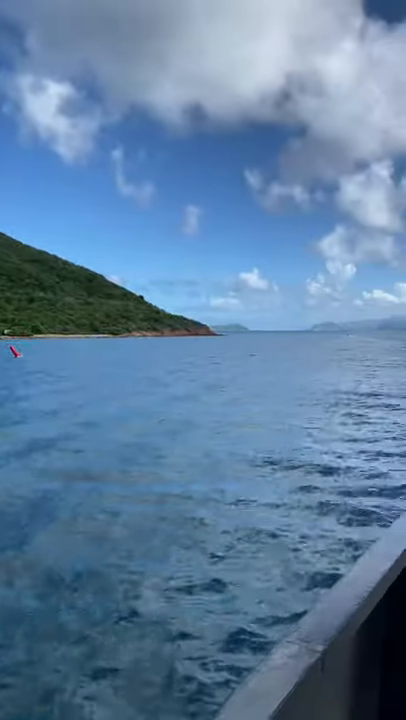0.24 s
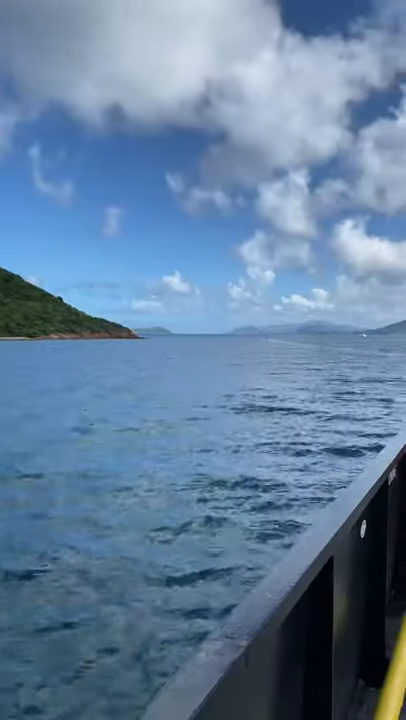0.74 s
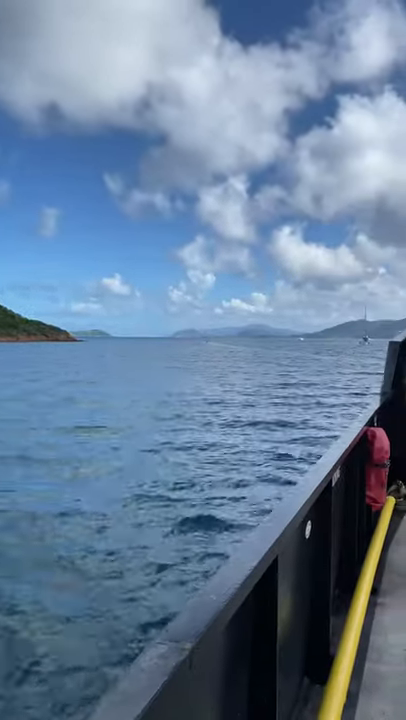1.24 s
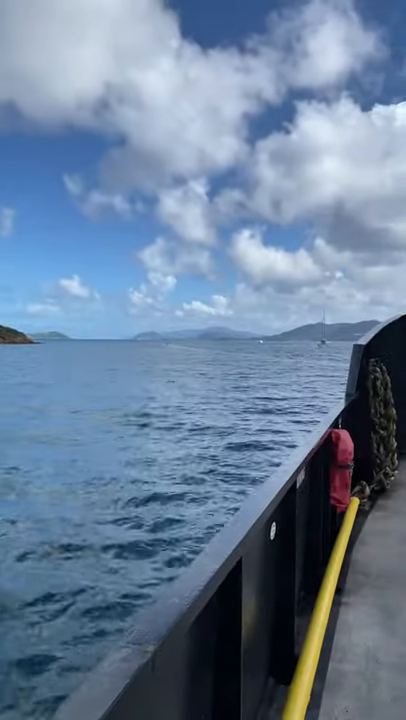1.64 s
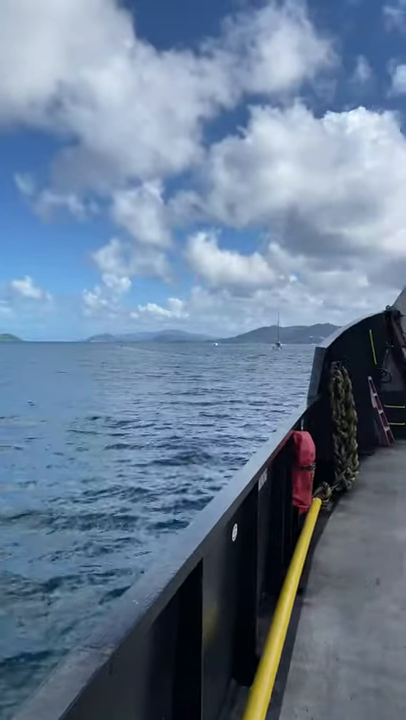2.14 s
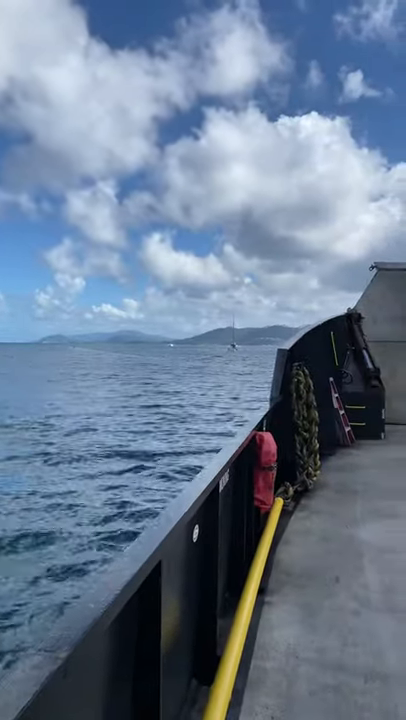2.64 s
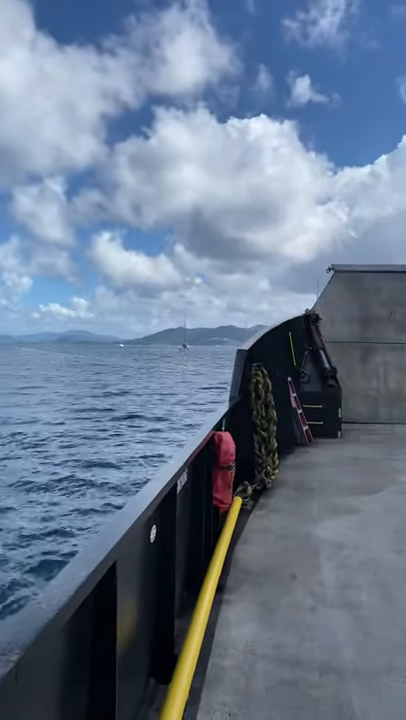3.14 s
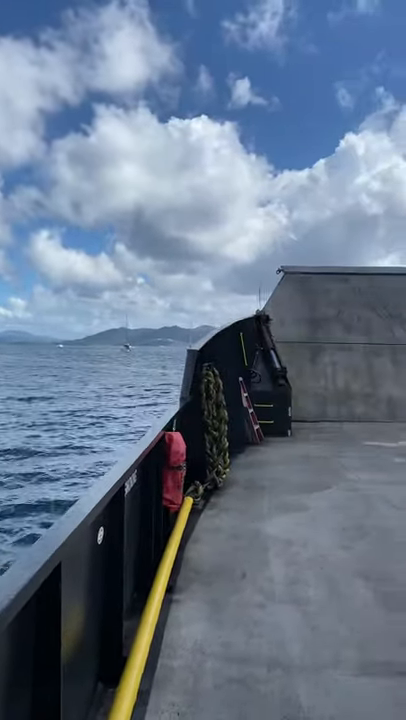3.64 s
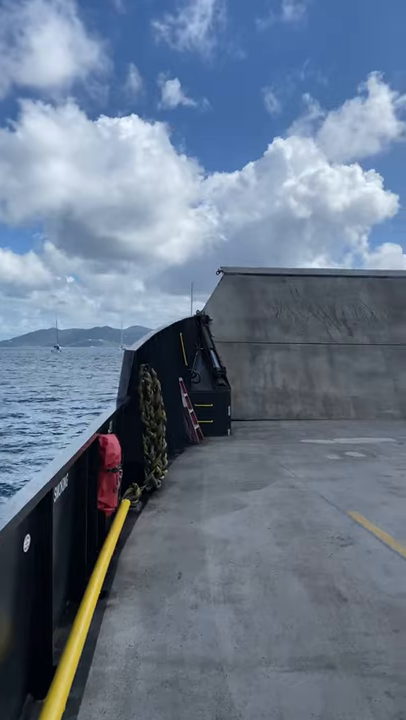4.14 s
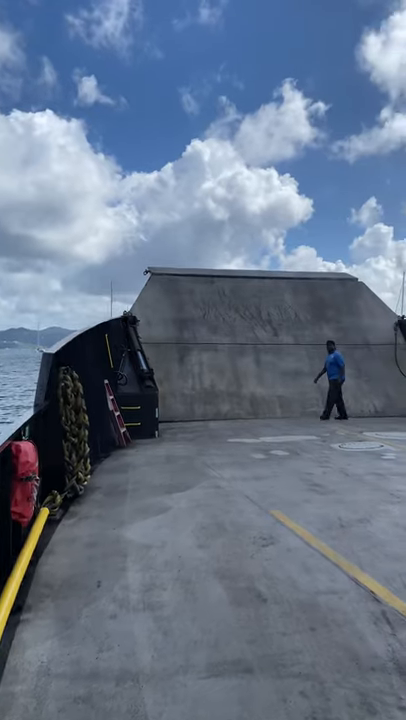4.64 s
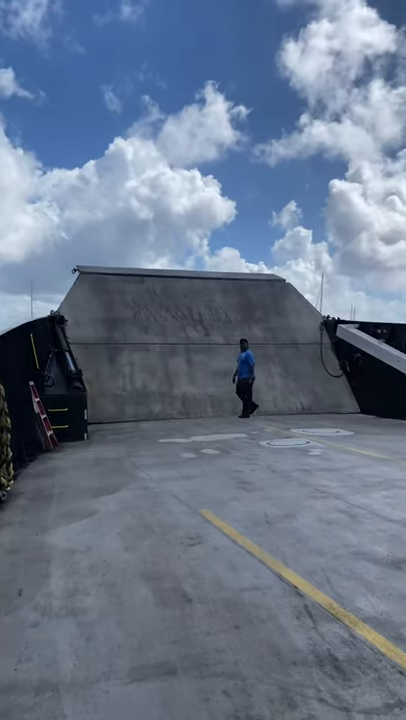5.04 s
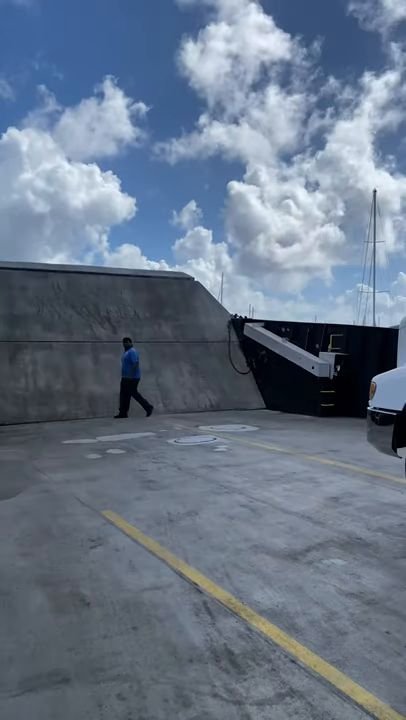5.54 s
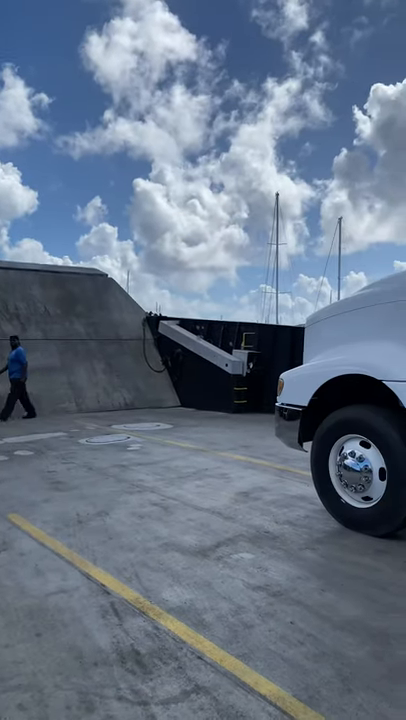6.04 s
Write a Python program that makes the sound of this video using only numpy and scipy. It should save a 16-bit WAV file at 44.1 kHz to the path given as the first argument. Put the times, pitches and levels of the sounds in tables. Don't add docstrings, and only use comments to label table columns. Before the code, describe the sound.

Wind buffets a handheld stereo microphone on a moving ferry. Low engine rumble and exhaust roar stay constant and grow slightly. Within the first two seconds, gear thumps the steel deck: a muffled knock, one loud crashing clank with a ringing tail that briefly makes the bass dip, then smaller rattling knocks. Afterwards the hum continues over soft hull wash, with tiny squeaks and a single dry tap past the middle.

```python
import sys
import numpy as np
from scipy import signal
from scipy.fft import rfft, irfft, next_fast_len
from scipy.io import wavfile
from scipy.ndimage import uniform_filter1d, map_coordinates

SR = 44100
rng = np.random.default_rng(int(sys.argv[2]) if len(sys.argv) > 2 else 0)


def attenuation_scalar(level_db):
    decades = np.asarray(level_db, float) / 20
    return 10 ** decades


def file_out(sig):
    cols = np.atleast_2d(sig).T
    lim = np.clip(cols, -1, 1)
    pcm = np.round(lim * 32767).astype(np.int16)
    wavfile.write(sys.argv[1], SR, pcm)


N = 277207


def unit(x):
    return x / np.sqrt(np.mean(x ** 2) + 1e-20)


def since(s):
    return np.maximum(np.arange(N) / SR - s, 0)


def along(points, hz):
    f, *cols = np.transpose(points)
    return np.array([np.interp(np.log(hz + 1), np.log(f + 1), c) for c in cols])


def curves(rows):
    s, *cols = np.transpose(rows)
    return [np.interp(np.arange(N) / SR, s, c) for c in cols]


def wobble(rate):
    knots = rng.standard_normal(int(N * rate / SR) + 4)
    return map_coordinates(knots, [np.arange(N) * rate / SR])


def filtered(x, response):
    m = next_fast_len(x.shape[-1] + 8192)
    spectrum = rfft(x, m) * response(np.fft.rfftfreq(m, 1 / SR))
    return irfft(spectrum, m)[..., :x.shape[-1]]


def rush(gain, patchy_db):
    z = signal.stft(rng.standard_normal((2, N)), nperseg=512)[2]
    field = rng.standard_normal(z.shape[1:])
    field = uniform_filter1d(field, size=6, axis=0)
    field = uniform_filter1d(field, size=12, axis=1)
    patchy = signal.istft(z * attenuation_scalar(patchy_db * unit(field)), nperseg=512)[1][:, :N]
    return unit(filtered(patchy, gain))


# (time [s], depth [dB], hold [s])
BASS_DUCKS = [
    (0.0, 12, 0.25),
    (0.875, 12, 0.31),
]


def bass_duck_db():
    fall_s, recover_s = .06, .15
    total_db = 0
    for s, depth_db, hold_s in BASS_DUCKS:
        fall = 1 - np.exp(-since(s) / fall_s)
        total_db = total_db + depth_db * fall * np.exp(-since(s + hold_s) / recover_s)
    return total_db


# (multiple of the firing rate [ratio], level [dB], unsteadiness [dB])
DIESEL_ORDERS = [(1, 0, .5), (2, -2, 1.5), (3, -11, 1.5), (7 / 3, -14, 1.5), (11 / 3, -14, 1)]
# (frequency [Hz], level re firing tone [dB])
TWIN_MACHINES = [(60.05, -4.5), (58.6, -6.5)]
# (frequency [Hz], level re firing tone [dB])
HUM_TONES = [(69.4, -13.5), (92.9, -13), (119.75, -7), (124.7, -15), (140.8, -20), (176.3, -15.5),
             (191, -17), (236, -19), (299, -24.5), (320, -27), (390, -24.5), (406, -21), (475, -26.5),
             (1360, -28), (1760, -36)]


def engine_tones():
    firing_hz = 43.96
    opposed_s = 4.35
    t = np.arange(N) / SR
    turns = firing_hz * t + 0.0015 * np.cumsum(wobble(0.98)) / SR
    tones = np.zeros(N)
    for order, db, loose_db in DIESEL_ORDERS:
        tones += attenuation_scalar(db + loose_db * wobble(2)) * np.sin(2 * np.pi * (order * turns + rng.random()))
    for k, (hz, db) in enumerate(TWIN_MACHINES):
        tones += (-1) ** k * attenuation_scalar(db) * np.sin(2 * np.pi * hz * (t - opposed_s))
    for hz, db in HUM_TONES:
        tones += attenuation_scalar(db + 1.5 * wobble(3)) * np.sin(2 * np.pi * hz * t + 1.43 * wobble(2))
    return np.sqrt(2) * attenuation_scalar(-22) * tones


# (time [s], level re roar [dB])
DRONES = [
    (0.0, -7),
    (.86, 10.5),
    (1.24, -0.5),
    (1.46, -0.3),
]


def deck_drone():
    rise_s, t60_s = .032, 1.3
    strength = 0
    for s, db in DRONES:
        strength = strength + attenuation_scalar(db - 60 * since(s) / t60_s) * (1 - np.exp(-since(s) / rise_s))
    return strength


# (frequency [Hz], level [dB per Hz])
EXHAUST_COLOUR = [(15, -90), (28, -56.5), (38, -42.5), (52, -36), (75, -37), (110, -42), (170, -43),
                  (230, -51.5), (400, -55.5), (600, -59), (810, -61.5), (1050, -61.5), (1500, -67.5),
                  (1950, -76), (2200, -74.5), (2700, -78.5)]


def machinery():
    rumble_db, roar_db = -21.5, -30
    grows_db = 0.52
    rumble_share = .6
    drone_hz = 1100
    t = np.arange(N) / SR
    duck_db = bass_duck_db()

    def colour(hz):
        return attenuation_scalar(along(EXHAUST_COLOUR, hz)[0])

    def low(hz):
        return 1 / (1 + (hz / 280) ** 4)

    rumble = rush(lambda hz: colour(hz) * np.sqrt(low(hz)), patchy_db=0.44)
    roar = rush(lambda hz: colour(hz) * np.sqrt(1 - low(hz)) * (hz < 2700), patchy_db=1.36)
    dull_roar = unit(filtered(roar, lambda hz: 1 / (1 + (hz / drone_hz) ** 2)))
    noise = attenuation_scalar(rumble_db + grows_db * (t - t.mean()) - rumble_share * duck_db) * rumble
    noise += attenuation_scalar(roar_db + 0.6 * wobble(6)) * (roar + deck_drone() * dull_roar)
    noise[0] += attenuation_scalar(-duck_db) * engine_tones()
    return noise


# (frequency [Hz], level [dB per Hz])
STEEL_COLOUR = [(60, -10), (200, 5), (1000, -5), (1850, -10.5), (2250, -6.5), (2700, -13.5), (3100, -9.5),
                (3700, -23.5), (4350, -18), (5500, -30.5), (7000, -38), (8000, -40.5), (10000, -50.5),
                (15500, -49)]


def steel_burst(t, centre_hz, dull_db):
    def colour(f):
        octaves = np.log2((f + 1) / centre_hz)
        slope_db = 4.6 * np.minimum(octaves, 0) - dull_db * np.maximum(octaves, 0)
        return attenuation_scalar(along(STEEL_COLOUR, f)[0] + slope_db)

    return unit(filtered(rng.standard_normal((2, len(t))), colour))


# (frequency [Hz], level [dB], 60 dB decay time [s])
PLATE_MODES = [(121, 3.5, 0.42), (180, 1.5, 0.76), (226.8, 2.5, 0.55), (380, -6, 0.24), (475, -3.5, 0.29),
               (650, -4.5, 0.38), (782, 2.5, 0.17), (942, 2.5, 0.36), (1350, -1, 0.16), (1680, -11, 0.23),
               (2280, -9, 0.19), (2560, -8, 0.25), (3160, -19, .15), (3280, -17, .15)]


def plate_ring(t, db, centre_hz):
    best_hz, heavy_db = 950, -20
    octaves = np.log2(centre_hz / (best_hz + 1))
    ring_db = db - 8 + .8 * (db - heavy_db)
    ring_db -= 10 * max(octaves, 0) + 3 * max(-octaves, 0)
    ring = np.zeros((2, len(t)))
    for hz, level_db, t60 in PLATE_MODES:
        envelope = attenuation_scalar(ring_db + level_db + rng.normal(0, 2.2) - 60 * t / t60)
        ring += envelope * np.sin(2 * np.pi * (hz * t + rng.random((2, 1))))
    return ring


# (time [s], rms level [dB], centre [Hz], dullness [dB per octave], 60 dB decay time [s])
KNOCKS = [(.298, -23, 1670, 22, .3), (.335, -30, 1300, 21, .4), (.790, -18.5, 3030, 11, .2),
          (0.8, -13.5, 2400, 2.5, .13), (.805, -19.5, 2310, .8, .08), (.814, -12, 1013, 11, .13),
          (.822, -20.5, 450, 6.5, 0.48), (.832, -17, 180, 6, .45), (.847, -22.5, 2700, 4.5, .25),
          (.905, -31.5, 1100, 2.5, 0.27), (0.999, -25.5, 2500, 18, 0.07), (1.044, -36, 2700, 7, 0.14),
          (1.209, -32, 3020, 3.5, 0.18), (1.252, -39.5, 2550, 3, 0.18), (1.292, -23.5, 704, 5.5, 0.26),
          (1.457, -23, 3400, 1.5, .2), (1.487, -27.5, 2820, 4.5, 0.33), (1.511, -31, 2790, 1, 0.18),
          (1.531, -30, 2990, -0.7, .2), (1.56, -37.5, 3030, 6, 0.22), (1.802, -37.5, 2980, 32, 0.15),
          (3.743, -27.5, 3200, -2.5, 0.023), (3.752, -39, 2900, 8, .15)]


def knocks():
    rattle_depth_db, rattle_rate, rattle_delay_s = 2.2, 140, .015
    hard_rise_s, soft_rise_s = .0017, .00016
    out, t = np.zeros((2, N + SR)), np.arange(SR // 2) / SR
    rattle_db = np.pad(rattle_depth_db * wobble(rattle_rate), (0, SR))
    for s, db, hz, dull_db, t60 in KNOCKS:
        start = round(s * SR)
        burst = steel_burst(t, hz, dull_db) * attenuation_scalar(db - 60 * t / t60)
        rattle = attenuation_scalar(rattle_db[start:][:len(t)] * (1 - np.exp(-t / rattle_delay_s)))
        rise = 1 - np.exp(-t / (hard_rise_s + soft_rise_s * dull_db))
        out[:, start:][:, :len(t)] += (burst + plate_ring(t, db, hz)) * rattle * rise
    return out[:, :N]


# (time [s], peak level [dB], 60 dB decay time [s])
TINKS = [(.812, -54.5, .2), (1.263, -37.5, .08), (1.457, -54.5, .1), (1.489, -56, .1), (1.531, -54, 0.083),
         (1.802, -39, 0.095), (1.844, -49, 0.1), (3.64, -56.5, .1), (5.021, -62.5, .12)]
# (frequency [Hz], level [dB])
FITTING_MODES = [(15150, -9.5), (15400, -6), (14250, -15), (12300, -19.5), (7440, -13.5)]
# (time [s], length [s], start pitch [Hz], end pitch [Hz], level [dB])
SQUEAKS = [
    (2.90, .09, 8550, 8600, -62),
    (3.02, .11, 7850, 8000, -56),
    (3.20, .06, 8600, 8600, -64),
    (3.61, .08, 8200, 8200, -62),
]


def fittings():
    out, t = np.zeros((2, N + SR)), np.arange(SR // 4) / SR
    for s, db, t60 in TINKS:
        ring = np.zeros((2, len(t)))
        for hz, level_db in FITTING_MODES:
            ring += attenuation_scalar(level_db + rng.normal(0, 3)) * np.sin(2 * np.pi * (hz * t + rng.random((2, 1))))
        ring *= attenuation_scalar(db - 60 * t / t60) * (1 - np.exp(-t / .001))
        bright = np.diff(rng.standard_normal((2, len(t) + 4)), 4) / 8
        tick = attenuation_scalar(db - 5.5 - 60 * t / .02) * bright
        out[:, round(s * SR):][:, :len(t)] += ring + tick
    for s, length, start_hz, end_hz, db in SQUEAKS:
        u = np.clip(t / length, 0, 1)
        glide = np.cumsum(start_hz + (end_hz - start_hz) * u) / SR
        out[0, round(s * SR):][:len(t)] += attenuation_scalar(db) * np.sin(np.pi * u) * np.sin(2 * np.pi * glide)
    return out[:, :N]


# (time [s], peak level [dB], half length [s])
GUSTS = [(0.054, -23, 0.087), (0.268, -25.5, .1), (0.496, -24, 0.086), (0.757, -26.5, 0.15),
         (0.989, -29, 0.096), (1.246, -31.5, .07), (1.49, -23.5, 0.13), (1.678, -31.5, 0.073),
         (1.843, -25, .07), (2.012, -30, 0.044), (2.247, -32.5, .04), (2.77, -35, .17), (3.215, -35, 0.1),
         (3.469, -30.5, .05), (3.703, -29.5, 0.11), (3.96, -30, .09), (4.275, -32.5, 0.12),
         (4.859, -35, .2), (5.272, -27.5, .08), (5.544, -34, .07), (5.848, -38.5, .08), (5.997, -26, 0.1),
         (6.2, -38, 0.13)]
# (frequency [Hz], level [dB per Hz])
BUFFET_COLOUR = [(20, -40), (60, -6), (120, 4), (200, -3), (320, -10.5), (600, -13), (1200, -36.5),
                 (3000, -72)]


def wind():
    t = np.arange(N) / SR
    strength = attenuation_scalar(-46.5)
    for s, db, half_s in GUSTS:
        strength = strength + attenuation_scalar(db) * np.exp(-((t - s) / half_s) ** 2)
    lumps = attenuation_scalar(4 * np.array([wobble(25), wobble(25)]))
    air = rush(lambda hz: attenuation_scalar(along(BUFFET_COLOUR, hz)[0]), patchy_db=1.5)
    return strength * unit(lumps * air)


# (frequency [Hz], level [dB per Hz])
WASH_COLOUR = [(2700, -81.5), (3500, -86), (4600, -87), (5600, -91.5), (7000, -96), (9000, -101.4),
               (12000, -104.7), (14200, -106.7), (15200, -113.9), (15800, -130)]
# (time [s], level [dB])
WASH_LEVEL = [(0, -49), (1.2, -48), (2.6, -51), (6.3, -49.7)]


def wash():
    spray_hz, spray_s, spray_db = 11000, 3.5, 2
    hiss = rush(lambda hz: attenuation_scalar(along(WASH_COLOUR, hz)[0]) * (hz >= 2700), patchy_db=1.97)
    spray = filtered(hiss, lambda hz: hz > spray_hz)
    lift = attenuation_scalar(spray_db * (2 - np.exp(-since(spray_s) / .1))) - 1
    return attenuation_scalar(curves(WASH_LEVEL)[0] + 0.84 * wobble(6.4)) * (hiss + lift * spray)


# (frequency [Hz], left-right likeness [0-1], left lead [rad], left louder [dB])
PORTS = [(70, .9995, 0, 0), (200, .995, 0, .2), (350, .95, -.1, .4), (520, .6, -.3, 1), (750, .1, .3, 1),
         (1000, .3, 1.5, 1), (1400, .3, .2, 1), (1800, .4, .4, 0), (2150, .65, 2.3, -.5),
         (3000, .65, 2, -.5), (4000, .1, 2.5, -.5), (4800, .65, 3.1, 0), (6500, .8, 2.65, 0),
         (9000, .75, 3.1, 0), (13000, .7, 3.5, 0), (15000, .5, 6, 0)]


def ports(pair, aside):
    m = next_fast_len(N + 8192)
    alike, lead, tilt_db = along(PORTS, np.fft.rfftfreq(m, 1 / SR))
    turn = np.arccos(np.clip(alike, 0, 1)) / 2
    shared, own = rfft(pair, m) * [np.cos(turn), np.sin(turn)]
    half = np.exp(.5j * aside * lead) * attenuation_scalar(tilt_db / 2)
    return irfft([(shared + own) * half, (shared - own) / half], m)[:, :N]


def scene():
    around = machinery() + fittings() + wash()
    return ports(around, aside=0.89) + ports(knocks(), aside=0.58) + wind()


# (frequency [Hz], level [dB per Hz])
FAINTEST_KEPT = [(3500, -112), (5000, -100), (6000, -101), (6900, -101), (8000, -98), (11000, -100),
                 (12500, -105), (14200, -107.5), (15500, -108)]


def thinned(mid):
    hz, _, z = signal.stft(mid, SR, nperseg=2048, boundary="even")
    per_hz = uniform_filter1d(np.abs(z) ** 2, size=4, axis=0) * 2048 / (.75 * SR)
    floor = attenuation_scalar(2 * along(FAINTEST_KEPT, hz)[0])[:, None]
    return signal.istft(z * (per_hz > floor), SR, nperseg=2048)[1][:N]


def top_cut(x):
    return signal.sosfilt(signal.butter(12, 15700, fs=SR, output="sos"), x)


def record(dry):
    limited = dry / (1 + np.abs(dry / .95) ** 4) ** (1 / 4)
    ending = np.clip((N - np.arange(N)) / (.004 * SR), 0, 1)
    left, right = limited * ending
    mid, side = thinned((left + right) / 2), (left - right) / 2
    return top_cut(np.array([mid + side, mid - side]))


dry = scene()
out = record(dry)
file_out(out)
```